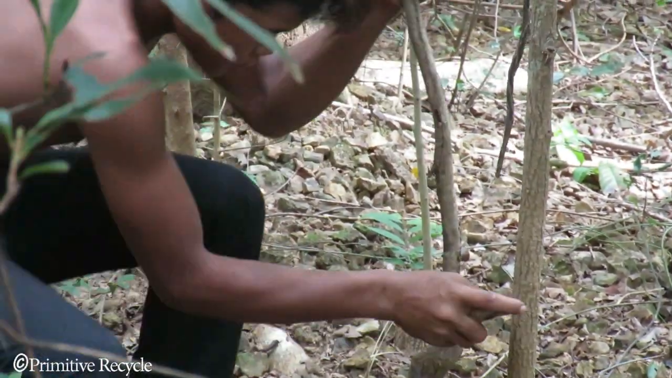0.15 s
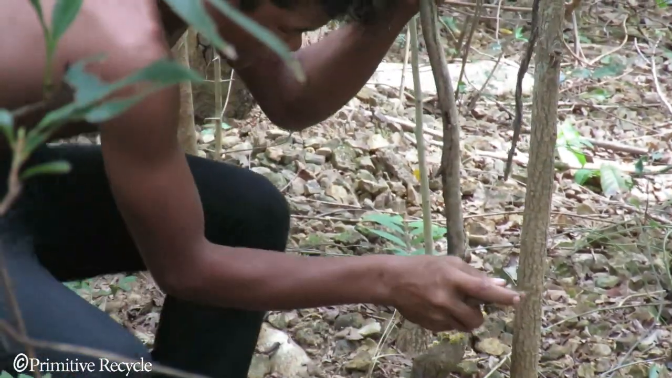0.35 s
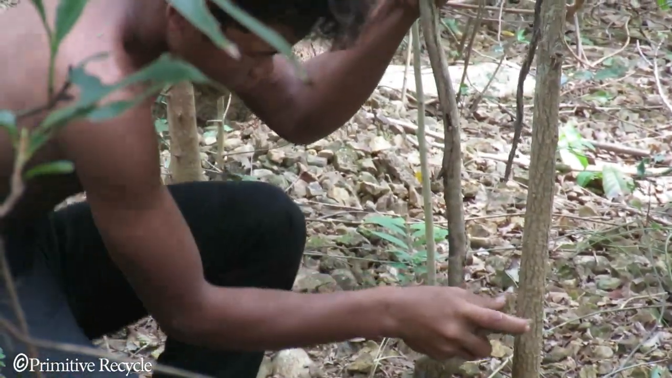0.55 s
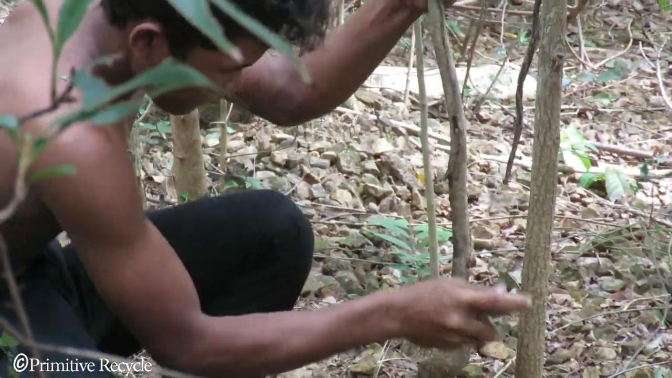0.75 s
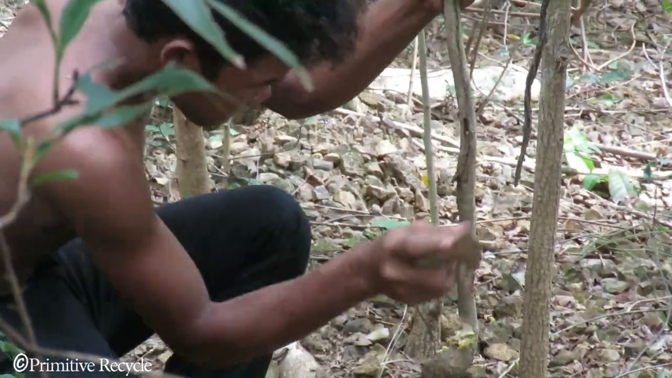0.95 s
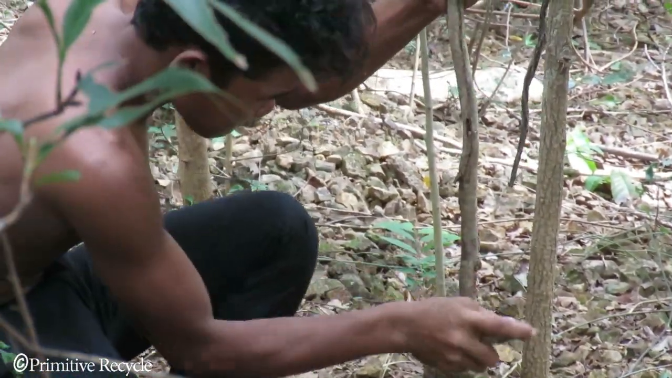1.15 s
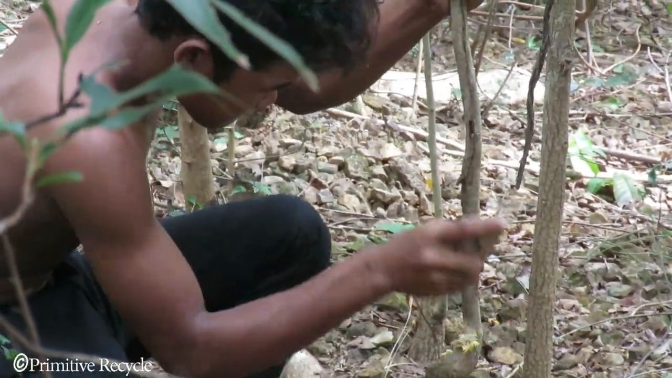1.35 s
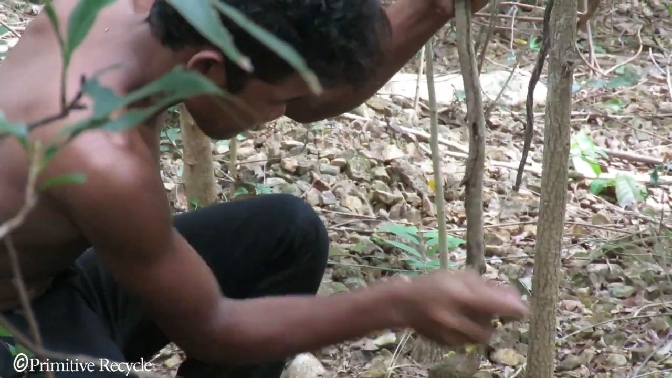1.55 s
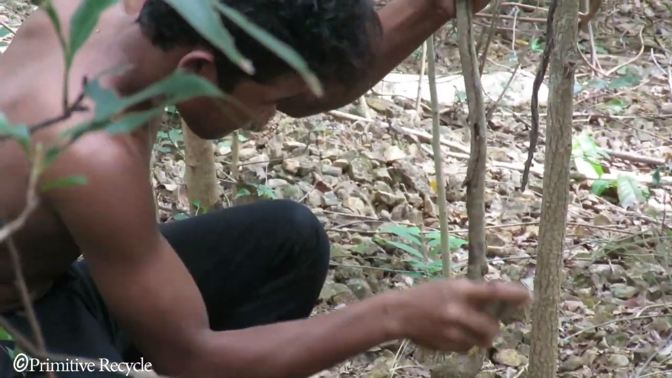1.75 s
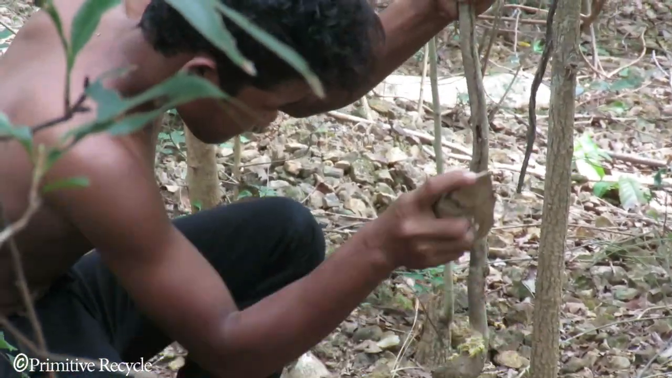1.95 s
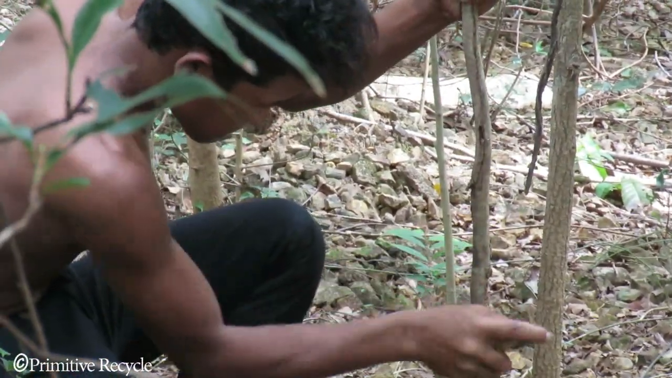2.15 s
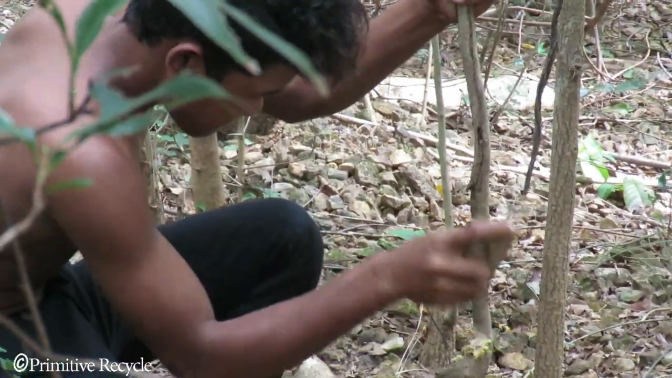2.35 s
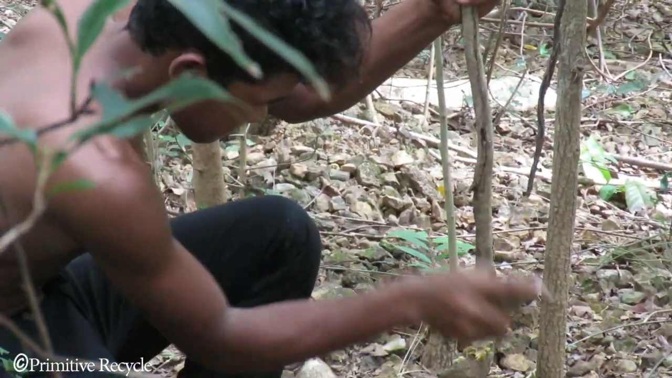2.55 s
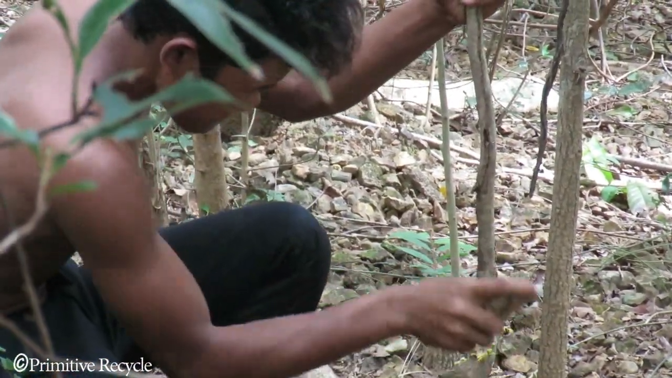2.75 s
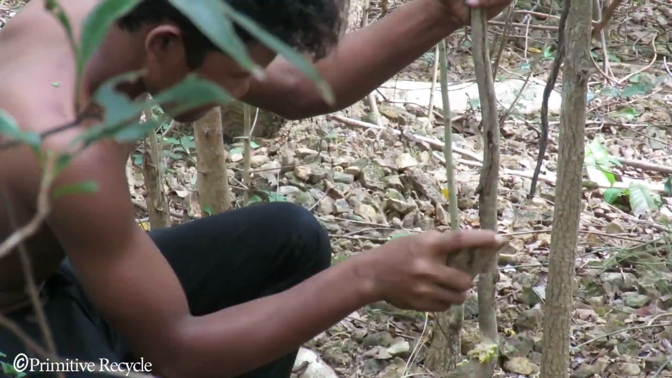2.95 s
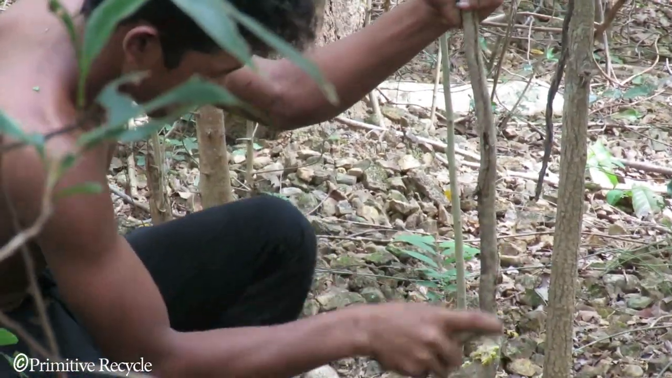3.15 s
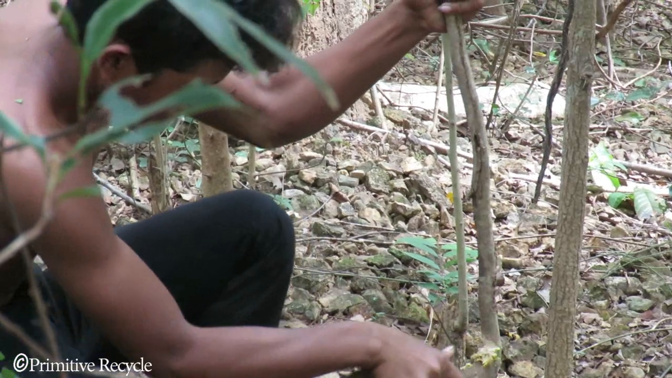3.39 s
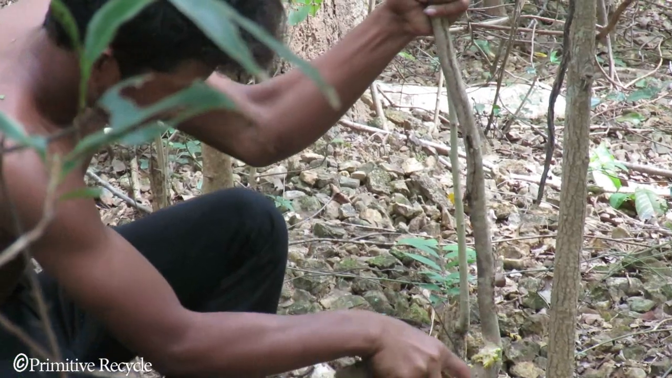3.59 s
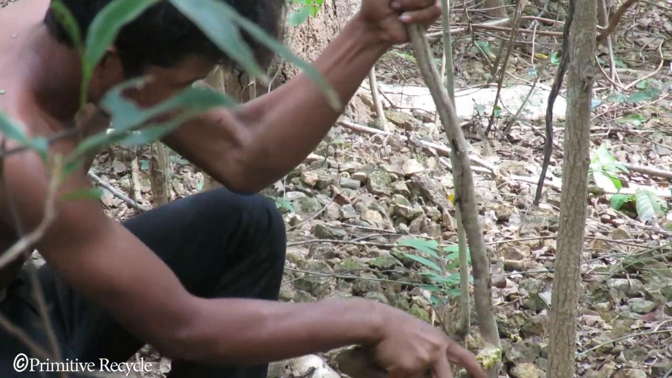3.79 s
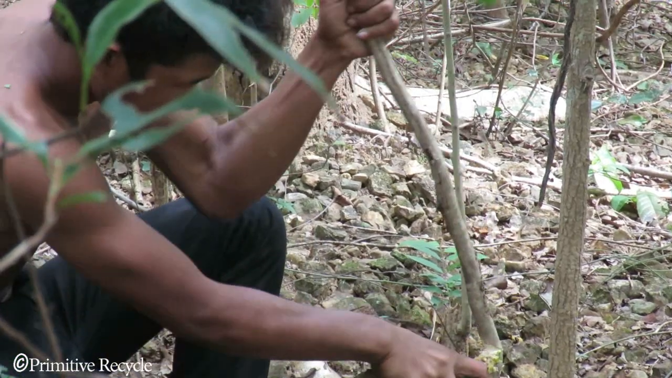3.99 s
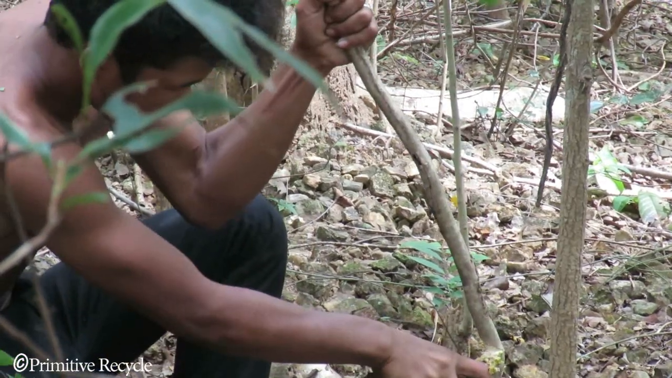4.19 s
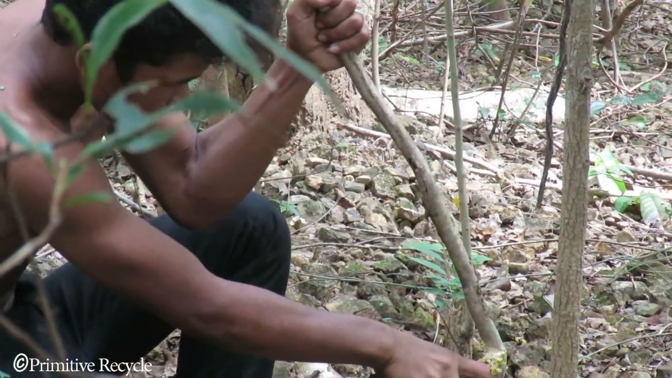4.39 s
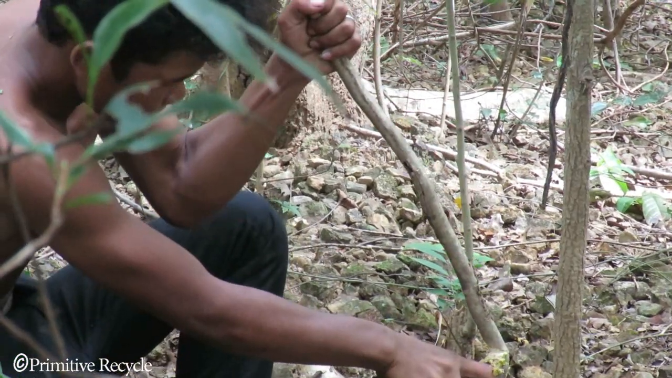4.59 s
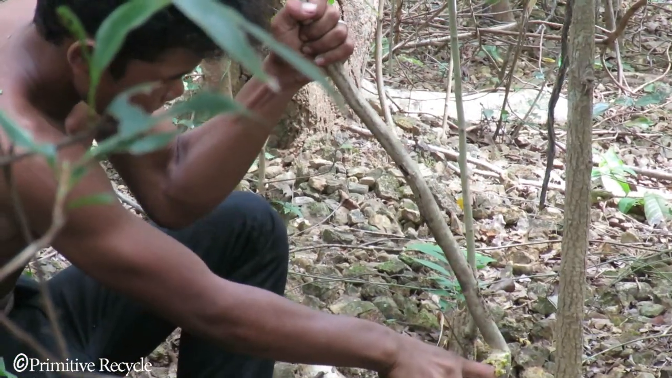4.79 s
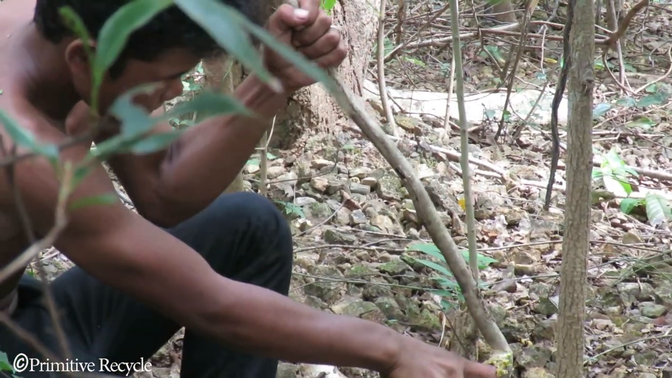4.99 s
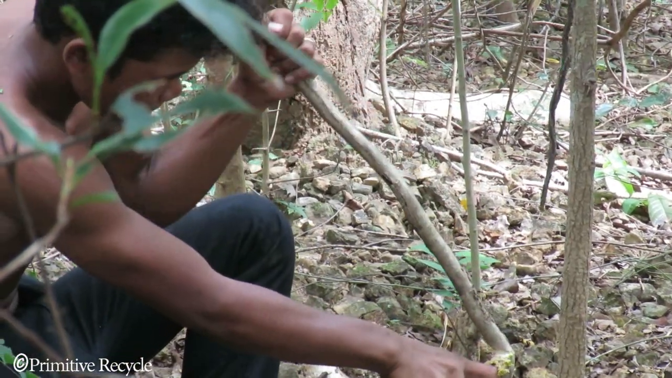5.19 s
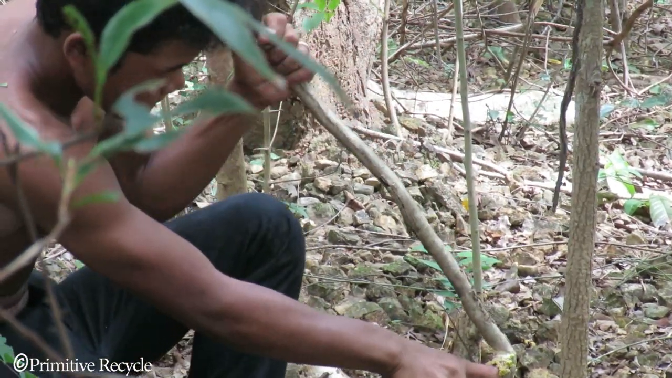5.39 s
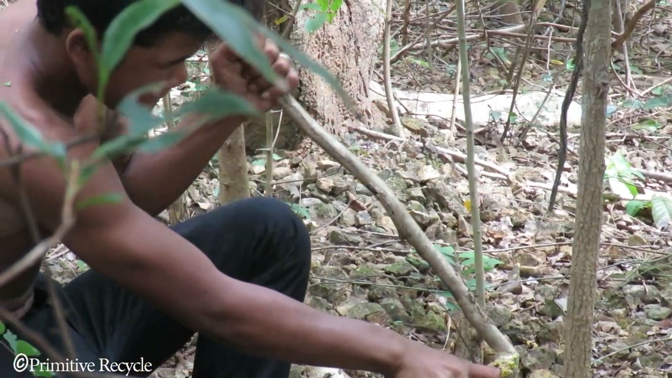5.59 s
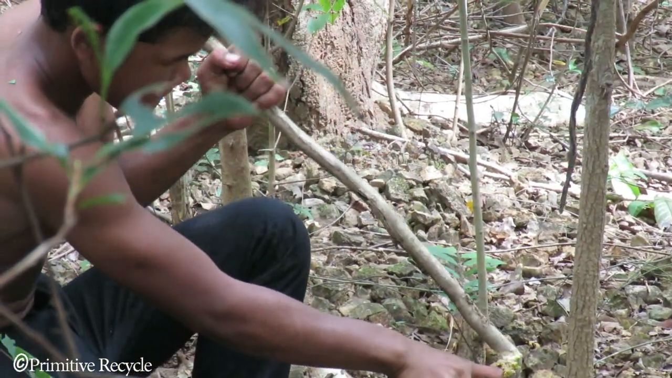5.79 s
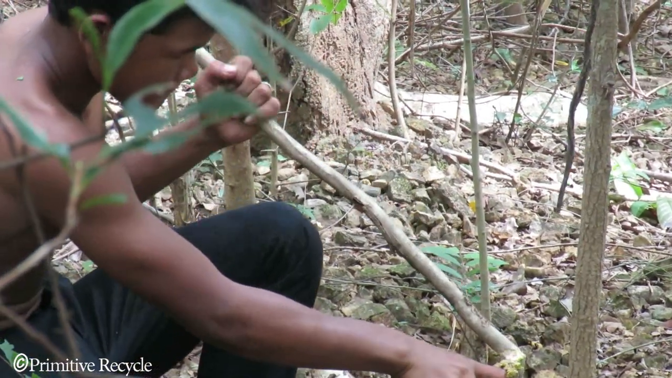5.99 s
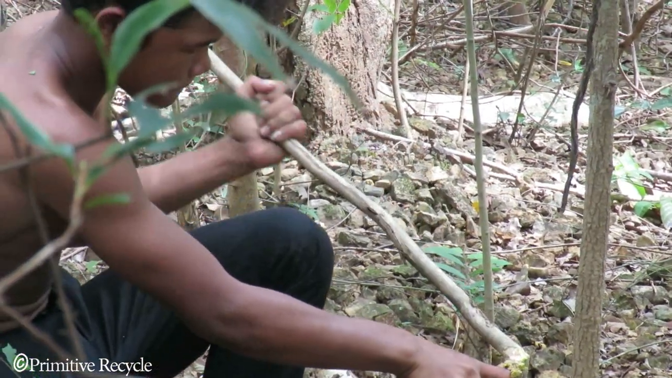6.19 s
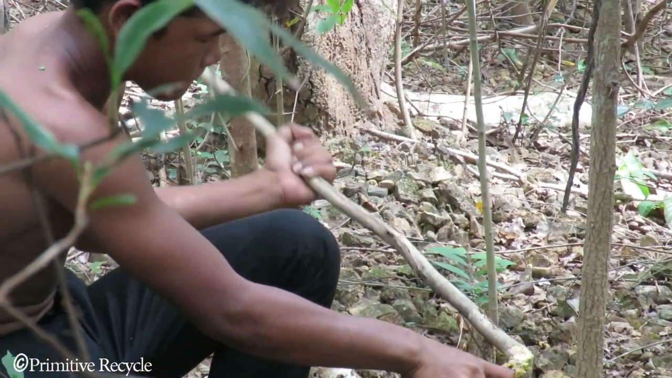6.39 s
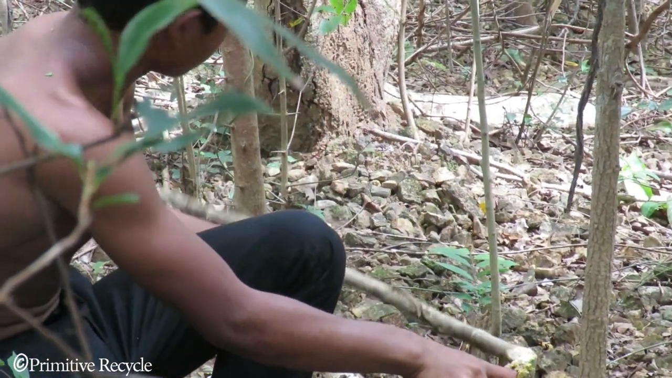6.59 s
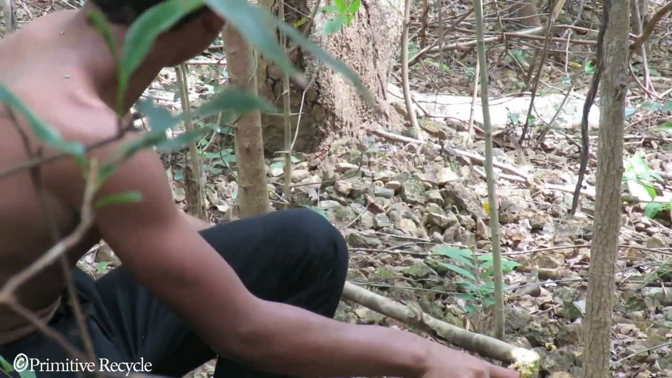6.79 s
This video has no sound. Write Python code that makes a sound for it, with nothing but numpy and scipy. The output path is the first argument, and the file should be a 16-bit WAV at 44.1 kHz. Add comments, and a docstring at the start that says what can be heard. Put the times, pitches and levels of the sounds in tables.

```python
"""In a quiet forest a hand-held stone taps a thin green stem twice, as leaves stir and a hand rubs the bark.
Four chops then excite the bending modes of the stem, with a ringing stone and hissing splinters.
The stem is next bent over: leaves swish as filtered noise, fibres at the cut snap and tear as noise
bursts and short tones, and at the end the bark drags on the ground as resonant grit. Throughout, far
air rumbles with a few faint humming bands, and trunks and ground return a short tail after sharp sounds."""
import sys
import numpy as np
from scipy import signal
from scipy.fft import rfft, irfft, next_fast_len
from scipy.io import wavfile
from scipy.ndimage import uniform_filter1d, map_coordinates

SR = 44100
rng = np.random.default_rng(int(sys.argv[2]) if len(sys.argv) > 2 else 0)


def file_out(sig):
    """Save sig as 16-bit WAV at sys.argv[1]."""
    # one column per channel
    cols = np.atleast_2d(sig).T
    # limit, then scale
    lim = np.clip(cols, -1, 1)
    pcm = np.round(lim * 32767).astype(np.int16)
    wavfile.write(sys.argv[1], SR, pcm)


def amplitude_ratio(level_db):
    """Convert a level in decibels to the matching linear amplitude (field) ratio."""
    exponent = np.asarray(level_db, float) / 20
    return 10 ** exponent


N = 301644

# level of the far air: (t/s, level/dB)
AIR_LEVEL = [(0.0, -54), (2.76, -52), (3.6, -53.5), (4.6, -53.5), (6.84, -51.5)]
# relative spectrum of the far air: (f/Hz, level/dB)
AIR_SPECTRUM = [(15, -70), (40, -9.5), (108, -32), (195, -10), (217, -10), (476, -13.5), (591, -27),
                (714, -25.5), (1370, -25.5), (1520, -23.5), (6560, -43.5), (14400, -56.5), (16000, -62)]
# narrow humming bands: (f/Hz, width of each of two cascaded resonances/Hz, level before drift/dB)
HUM_BANDS = [(93.7, 79, -52), (492, 87, -59.5), (732, 116, -58), (1032, 110, -65.5)]
# slow drift of the lowest humming band: (t/s, level/dB)
RUMBLE_DRIFT = [(0, 1.5), (2.7, 0), (3.9, -3.5), (5.3, -2), (6.84, -0.5)]
# left-right correlation of the far air: (f/Hz, likeness from 1 to -1, clipped beyond)
FAR_LIKENESS = [(60, 1), (130, 0.89), (330, -0.69), (700, 0.1), (2000, -0.55), (7000, -1.1)]
# left-right correlation of the near noises: (f/Hz, likeness)
NEAR_LIKENESS = [(60, .95), (300, 0.18), (1400, 0.93), (3100, 0.98), (7000, 0.84), (15000, 0.15)]
# decay of the echoes off trunks and ground: (f/Hz, t60/s)
TRUNK_DECAY = [(150, 0.43), (600, 0.17), (2000, 0.39), (5000, 0.71), (12000, 0.074)]
# leaf movement: (t/s, level/dB)
RUSTLE = [(0, -45), (.1, -50.5), (.33, -46.5), (.44, -50), (.7, -56.5), (1.14, -55), (1.4, -61),
          (2.93, -61), (3, -55), (3.1, -61), (3.82, -55.5), (4.06, -46.5), (4.25, -49), (4.42, -55.5),
          (4.9, -51), (5.3, -50.5), (5.45, -56.5), (5.65, -49.5), (6.2, -50.5), (6.5, -56), (6.84, -52.5)]
# relative spectrum of the leaf body: (f/Hz, level/dB)
LEAF_SPECTRUM = [(150, -1), (400, 0), (1000, -2.5), (2500, -6.5), (4500, -10), (8000, -18), (16000, -49)]
# relative spectrum of the fine fizz: (f/Hz, level/dB)
FIZZ_SPECTRUM = [(1500, -31.5), (4000, -2.5), (7000, -8), (11000, -9.5), (14000, -13.5), (16000, -10)]
# bark rubbed by the hand, then dragged on the ground: (start t/s, length/s, level/dB, swell over stroke/dB)
STROKES = [(0.3, 0.11, -52.5, 3), (6.627, 0.066, -48.5, 3.5), (6.775, 0.061, -43, -11.5)]
# hollow resonances of the bark: (f/Hz, width of each of two cascaded resonances/Hz, level/dB)
BARK_MODES = [(690, 170, 7), (1950, 400, 3), (3900, 700, -10)]
# snapping and tearing fibres: (t/s, relative level/dB, t60/s, click strength/dB, treble level/dB)
SNAPS = [(3.351, -44.5, 0.039, 10, -7), (3.527, -44.5, 0.019, 11.5, -6), (3.648, -45, 0.027, 14, -10),
         (3.8921, -30.5, 0.086, -6, -7), (3.9915, -30.5, 0.03, 5, -31), (4.0432, -44, 0.066, 16, -25),
         (4.456, -35.5, 0.041, 7.5, -14), (4.523, -21.5, 0.077, 4, -6), (4.588, -27, 0.05, -3, -12),
         (4.607, -37.5, 0.21, 11, -5), (4.7543, -39, 0.04, 13.5, -18), (4.8422, -29.5, 0.08, 10.5, -4),
         (4.87, -20.5, 0.078, 1, -9.5), (5.0482, -40, 0.03, 8, -6), (5.1856, -27, 0.097, 14, -19),
         (5.206, -32.5, 0.067, 14.5, -18), (5.2683, -27, 0.086, 1, -12), (5.29, -25, 0.067, -1, -12),
         (5.4798, -37.5, 0.045, 8, -20), (5.5041, -29.5, 0.07, -2, -9), (5.554, -23.5, 0.077, 5, -11),
         (5.604, -28, 0.2, 0, -10), (5.6245, -27.5, 0.072, -6, -5), (5.654, -30.5, 0.056, 7, -8),
         (5.6942, -16.5, 0.052, 10.5, -9), (5.7042, -24.5, 0.22, 11, -7.5), (5.7518, -28, 0.13, 13.5, -1),
         (5.7803, -33.5, 0.44, 14.5, -10), (5.8898, -28, 0.048, 6, -8), (5.893, -25.5, 0.29, 10, -11),
         (6.025, -28, 0.048, 4, -14), (6.042, -26, 0.08, 2, -10), (6.1293, -31.5, 0.12, 11, -3),
         (6.158, -30, 0.14, 12.5, -6), (6.349, -45.5, 0.047, 16.5, -21), (6.773, -35.5, 0.27, 6, -10.5)]
# short wooden pips and dull bumps: (t/s, level/dB, f/Hz, t60/s)
PIPS = [(2.086, -39, 1790, 0.019), (4.184, -42, 1450, 0.048), (4.608, -39.5, 439, 0.18),
        (6.68, -35, 236, 0.067), (5.135, -40, 1625, 0.12), (5.949, -19.5, 1320, 0.0074),
        (5.949, -27, 530, 0.021), (5.96, -25, 1100, 0.0085), (6.452, -32, 343, 0.033),
        (6.619, -40.5, 2400, .03), (6.36, -39, 194, 0.073)]
# stone on stem: (t/s, level/dB, low, middle and high mode levels/dB, splinter level/dB, sideways modes/dB)
BLOWS = [(0.1629, -24.5, 36, 11, -8, -24, 2), (0.5449, -15, 19, 7, -34, -27, 0.5),
         (1.1924, 1.5, 0.5, -5.5, 7, -34, -4.5), (1.721, 0.5, 1, -0.5, 7.5, -29.5, -1.5),
         (2.2349, 1.5, -1.5, -6, 10.5, -25.5, 4), (2.7184, 2, 0.5, 0.5, 19, -27, 2)]
# bending modes of the loaded stem: (f/Hz, level/dB, t60/s)
STEM_MODES = [(124.1, -15.5, 0.37), (187.5, -8, 0.14), (245.4, 4.5, 0.047), (365.6, 5.5, 0.037),
              (606.5, 1.5, 0.055), (700, -5.5, 0.06), (1020, -2.5, 0.042), (1166, 1.5, 0.036),
              (1480, -10.5, 0.04), (1973, -4.5, 0.029), (2140, -10, 0.045), (2477, -7.5, 0.037),
              (3030, -16, 0.015), (3960, -6.5, 0.014)]
# modes that bend across the cut, favoured by a slanted blow: (row of STEM_MODES)
SIDEWAYS_ROWS = [1, 5, 10]
# relative spectrum of the splinters: (f/Hz, level/dB)
SPLINTER_SPECTRUM = [(400, 7.5), (1000, 2), (2200, 5.5), (3600, -2.5), (4600, 1.5), (6500, -8),
                     (10000, -12.5), (15000, -24.5)]
# ringing of the stone: (f/Hz, relative level/dB, t60/s)
STONE_MODES = [(4100, 0.5, 0.094), (4770, -6, 0.037), (2130, -17, 0.66), (5360, -9, 0.11)]


def unit(x):
    """Normalisation to an rms of 1."""
    return x / np.sqrt(np.mean(x ** 2) + 1e-20)


def along(points, hz):
    """Interpolation of (f/Hz, value) points on a logarithmic frequency axis."""
    f, v = np.transpose(points)
    return np.interp(np.log(hz + 1), np.log(f + 1), v)


def curve(rows):
    """Linear interpolation of (t/s, value) rows to one value per sample."""
    s, values = np.transpose(rows)
    return np.interp(np.arange(N) / SR, s, values)


def wobble(rate):
    """Smooth random modulation by spline interpolation of rate knots a second."""
    knots = rng.standard_normal(int(N * rate / SR) + 4)
    return map_coordinates(knots, [np.arange(N) * rate / SR])


def filtered(x, response):
    """Linear filtering: the spectrum is multiplied by a complex response of frequency."""
    n = x.shape[-1]
    m = next_fast_len(n + 8192)
    return irfft(rfft(x, m) * response(np.fft.rfftfreq(m, 1 / SR)), m)[..., :n]


def peak(f, hz, width_hz):
    """Second-order resonance: causal response with unit gain at hz."""
    return 1j * f * width_hz / (hz * hz - f * f + 1j * f * width_hz)


def add(mix, s, sound):
    """Superposition of a two-channel sound from time s."""
    part = mix[:, round(s * SR):][:, :sound.shape[1]]
    part += sound[:, :part.shape[1]]


def pair(white, spectrum, alike):
    """Interchannel correlation: two coloured noises mixed into left and right, rms 1."""
    turn = lambda hz: np.arccos(np.clip(along(alike, hz), -1, 1)) / 2
    mid, side = filtered(white, lambda hz: spectrum(hz) * [np.cos(turn(hz)), np.sin(turn(hz))])
    return unit(np.array([mid + side, mid - side]))


def rush(spectrum, alike, grain_db):
    """Amplitude modulation of coloured stereo noise: millisecond grains of grain_db make it crackle."""
    grains = amplitude_ratio(grain_db * unit(uniform_filter1d(rng.standard_normal(N), size=60)))
    return pair(grains * rng.standard_normal((2, N)), lambda hz: amplitude_ratio(along(spectrum, hz)), alike)


def patchy(x, patch_db):
    """Time-frequency modulation: random patches, a few hundred Hz by a few hundredths of a second."""
    z = signal.stft(x, nperseg=256)[2]
    field = uniform_filter1d(rng.standard_normal(z.shape[1:]), size=3, axis=0)
    field = uniform_filter1d(field, size=5, axis=1)
    return unit(signal.istft(z * amplitude_ratio(patch_db * unit(field)), nperseg=256)[1][:, :N])


def air():
    """Filtered noise: far rumble and hiss, with resonant narrow bands that hum and waver."""
    level_db = curve(AIR_LEVEL) + 0.83 * wobble(6.9)
    sound = amplitude_ratio(level_db) * rush(AIR_SPECTRUM, FAR_LIKENESS, grain_db=0.0)
    drift_db = curve(RUMBLE_DRIFT)
    for hz, width_hz, db in HUM_BANDS:
        band = pair(rng.standard_normal((2, N)), lambda f: peak(f, hz, width_hz) ** 2, FAR_LIKENESS)
        sound += amplitude_ratio(db + drift_db * (hz < 200) + 1.2 * wobble(3.306)) * band
    return sound


def forest(x):
    """Diffuse reverberation: convolution with decaying noise, a fresh tail for every quarter second."""
    wet, step = np.zeros((2, N + SR)), SR // 4
    for i in range(0, N, step):
        hz, t, z = signal.stft(rng.standard_normal((3, SR // 2)), SR, nperseg=256)
        decay = amplitude_ratio(-60 * t / along(TRUNK_DECAY, hz)[:, None])
        tail = signal.istft(z * decay, SR, nperseg=256)[1]
        tail = tail[0] + 0.091 * tail[1:]  # a shared tail, slightly different on each side
        echo = signal.fftconvolve(x[None, i:i + step], tail / np.linalg.norm(tail[0]), axes=1)
        wet[:, i + 300:][:, :echo.shape[1]] += echo  # delayed by 300 samples
    return wet[:, :N]


def leaves():
    """Modulated noise and random impacts: leaves brush and tick in clumps, with fizz around the snaps."""
    fizz_db, fizz_db_per_db, reference_db = -56, 1.25, -51  # fizz level at a reference rustle, and its growth
    tear_db, tear_spread_s = -28, 0.04  # fizz of tearing fibres under each snap, time it spreads
    ticks_per_s, tick_db, tick_scatter_db = 200, -2.5, 2.5  # single leaf ticks
    t = np.arange(N) / SR
    body_db = curve(RUSTLE)
    tearing = sum(amplitude_ratio(min(db, -27) + tear_db) ** 2 * np.exp(-np.abs(t - s) / tear_spread_s)
                  for s, db, *_ in SNAPS)
    fizz = np.sqrt(amplitude_ratio(fizz_db + fizz_db_per_db * (body_db - reference_db)) ** 2 + tearing)
    clumps = wobble(70)
    brush = patchy(rush(LEAF_SPECTRUM, NEAR_LIKENESS, grain_db=0.0), patch_db=2.5)
    body = amplitude_ratio(body_db + 0.92 * clumps) * brush
    ticks = (rng.random(N) < ticks_per_s / SR) * amplitude_ratio(tick_db + tick_scatter_db * rng.exponential(size=N))
    ticks = signal.fftconvolve(ticks, amplitude_ratio(-60 * t[:SR // 100] / 0.0042))[:N]
    ticks = ticks * rush(LEAF_SPECTRUM, NEAR_LIKENESS, grain_db=7)
    body += amplitude_ratio(body_db) * filtered(ticks, lambda f: peak(f, 4400, 5000))
    fine = patchy(rush(FIZZ_SPECTRUM, NEAR_LIKENESS, grain_db=1.5), patch_db=2.5)
    return body + fizz * amplitude_ratio(clumps) * fine


def scrape():
    """Friction-driven resonance: rough grains excite the bark; each stroke bites, changes level and lets go."""
    attack_db_per_s, release_db_per_s = 800, 720
    t = np.arange(N) / SR
    stroke = np.zeros(N)
    for s, length, db, swell_db in STROKES:
        level_db = db + swell_db * np.clip((t - s) / length, 0, 1)
        before_db = attack_db_per_s * np.maximum(s - t, 0)
        after_db = release_db_per_s * np.maximum(t - s - length, 0)
        stroke += amplitude_ratio(level_db - before_db - after_db)
    grit = amplitude_ratio(2 * wobble(150)) * rng.standard_normal(N)
    wood = lambda f: sum(amplitude_ratio(db) * peak(f, hz, width_hz) ** 2 for hz, width_hz, db in BARK_MODES)
    return stroke * unit(filtered(grit, wood))


def pips():
    """Damped oscillation: each pip or bump is one brief tone."""
    mix, t = np.zeros((2, N)), np.arange(SR // 6) / SR
    for s, db, hz, t60 in PIPS:
        waver = np.cumsum(rng.normal(0, 0.11, len(t)))  # phase drift keeps the tone woody
        swell = 1 - np.exp(-t * hz / 0.41)
        tone = amplitude_ratio(db - 60 * t / t60) * swell * np.sin(2 * np.pi * hz * t + waver)
        add(mix, s, np.array([tone, tone]))
    return mix


def snaps():
    """Fracture impulse: each snap is a click, a burst of uneven crackle and a short dull knock of the wood."""
    knock_db, rise_s, softening = -7, 0.0035, 0.67  # how much a weak click slows the crackle
    mix, t = np.zeros((2, N)), np.arange(SR // 6) / SR
    # the break itself rings the split wood
    spike = filtered(1.0 * (t == 0), lambda f: peak(f, 4900, 3600) + 2.3 * peak(f, 2500, 310))
    for s, db, t60, click_db, treble_db in SNAPS:
        noise = rng.standard_normal((4, len(t)))
        uneven = amplitude_ratio(2.36 * unit(uniform_filter1d(noise[3], size=40)))
        peel_s = rise_s * amplitude_ratio(-click_db) ** softening  # a fibre that gives without a click peels slowly
        fade = (1 - np.exp(-t / peel_s)) * amplitude_ratio(-60 * t / t60) * uneven
        fade += amplitude_ratio(click_db - 3.5 - 60 * t / 0.0077)
        colour = [(700, -31), (1800, -5), (2600, -3.0), (4500, -6.0),
                  (8000, treble_db), (12500, treble_db), (16000, treble_db - 14)]  # (f/Hz, level/dB)
        crack = fade * pair(noise[:2], lambda f: amplitude_ratio(along(colour, f)), NEAR_LIKENESS)
        thud = unit(filtered(noise[2], lambda f: peak(f, 440, 440)))
        knock = amplitude_ratio(knock_db - 60 * t / 0.039) * thud
        click = amplitude_ratio(click_db + 5) * spike / spike.max()
        add(mix, s, amplitude_ratio(db - 10.0) * (crack + knock + click))
    return mix


def stem_ring(t, tap, low_db, middle_db, high_db, sideways_db):
    """Modal synthesis: dispersed bending modes ring, weighted by where the edge lands and how it leans."""
    tap_pitch = 1.13  # a light tap bounces off: the unloaded stem rings higher and undamped
    grip_s, grip_db = 0.0047, -7.5  # the stone stays in the cut and soon damps the ringing
    hz, mode_db, t60 = np.transpose(STEM_MODES)[:, :, None]
    row = np.arange(len(STEM_MODES))[:, None]
    age = np.maximum(t - 0.0058 / np.sqrt(hz), 0)  # bending waves disperse: low modes arrive later
    sign = np.where(hz < 840, 1, -(-1) ** row)  # low modes all push the same way at first
    lean_db = np.where(hz < 450, 1.2, 0) * np.array([1, -1])[:, None, None]  # lower stem stands to the left
    damped_db = np.where(hz > 230, grip_db, 0) / (1 + np.exp((grip_s - t) / 0.00082))
    spot_db = np.interp(np.log(hz), np.log([300, 650, 1050, 2500]), [low_db, middle_db, 0, high_db])
    slant_db = sideways_db * np.isin(row, SIDEWAYS_ROWS)
    level_db = mode_db + spot_db + lean_db + slant_db + rng.normal(0, 0.32, hz.shape)
    pitch = hz * tap_pitch ** tap * rng.normal(1, .006, hz.shape)  # the grip shifts the modes a little
    swell = 1 - np.exp(-age * hz / 0.22)  # each mode takes part of a cycle to swing fully
    # the held green stem rings unsteadily
    waver = np.cumsum(rng.normal(0, 0.074, age.shape) * (age > .006), axis=1)
    envelope = sign * swell * amplitude_ratio(level_db - 60 * age / t60 + damped_db * (not tap))
    return np.sum(envelope * np.sin(2 * np.pi * pitch * age + waver), axis=1)


def radiate(ring):
    """Contact and radiation filtering: green bark cushions the treble, a thin stem radiates little bass."""
    contact_hz = 1390
    return filtered(ring, lambda f: (1j * f / (130 + 1j * f) / (1 + 1j * f / contact_hz)) ** 2
                    * 1j * f / (45 + 1j * f))


def splinters(t):
    """Decaying noise: splinters hiss after the blow while chips fall unevenly."""
    debris = amplitude_ratio(1.9 * unit(uniform_filter1d(rng.standard_normal(len(t)), size=200)))
    fade = amplitude_ratio(-60 * t / 0.046) + amplitude_ratio(-6.5 - 60 * t / 0.28) * debris
    noise = rng.standard_normal((2, len(t)))
    return fade * pair(noise, lambda f: amplitude_ratio(along(SPLINTER_SPECTRUM, f)), NEAR_LIKENESS)


def stone_ring(t):
    """Modal synthesis: the struck stone rings in a few damped modes of slightly drifting phase."""
    chime = np.zeros(len(t))
    for hz, db, t60 in STONE_MODES:
        drift = np.cumsum(rng.normal(0, hz / 45000, len(t)))
        chime += amplitude_ratio(db + rng.normal(0, 1.2) - 60 * t / t60) * np.sin(2 * np.pi * hz * t + drift)
    return chime * (1 - np.exp(-t / 0.00086))


def chops():
    """Impact excitation: each blow rings the stem and the stone and sets splinters hissing."""
    mix, t = np.zeros((2, N)), np.arange(SR // 3) / SR
    for s, db, low_db, middle_db, high_db, splinter_db, sideways_db in BLOWS:
        tap = db < -10
        blow = radiate(stem_ring(t, tap, low_db, middle_db, high_db, sideways_db))
        chime = amplitude_ratio(splinter_db + 15.0) * stone_ring(t)  # a splintering blow jars the stone most
        debris = amplitude_ratio(splinter_db) * (splinters(t) + chime)
        add(mix, s, amplitude_ratio(db) * (blow / np.abs(blow).max() + debris))
    return mix


def scene():
    """Superposition of all sources; the near sharp ones reverberate in the forest."""
    near = chops() + snaps() + pips()
    return air() + amplitude_ratio(-24.5) * forest(near.mean(axis=0)) + leaves() + scrape() + near


def band_limit(x):
    """A steep low-pass at the top of the band."""
    return signal.sosfilt(signal.butter(12, 16470, fs=SR, output="sos"), x)


def record(dry):
    """Band limiting and soft saturation: the microphone loses deep bass and top treble, then peaks round off."""
    mic = lambda f: (1j * f / (35 + 1j * f)) ** 2 / np.sqrt(1 + (f / 15500) ** 24)
    x = filtered(dry, mic)
    x = x / (1 + np.abs(x / .95) ** 6) ** (1 / 6)
    return band_limit(x)


dry = scene()
out = record(dry)
file_out(out)
```